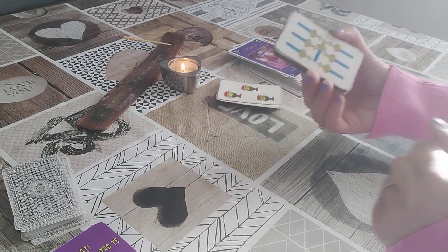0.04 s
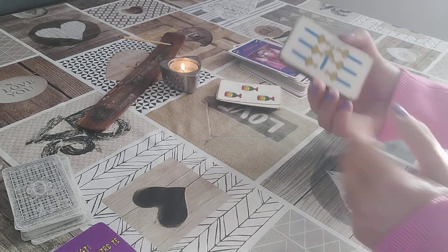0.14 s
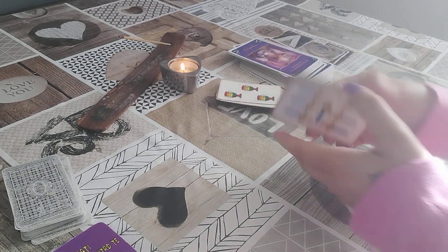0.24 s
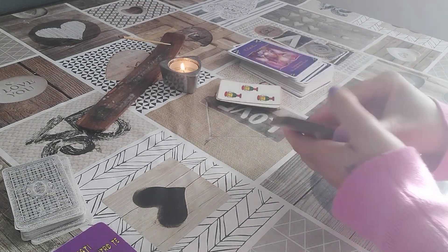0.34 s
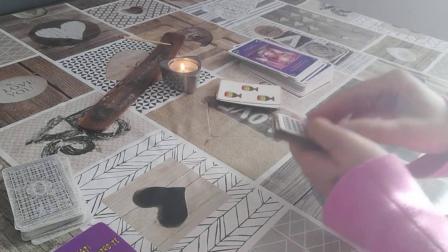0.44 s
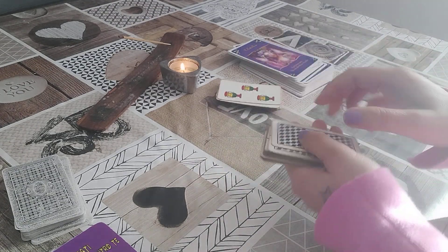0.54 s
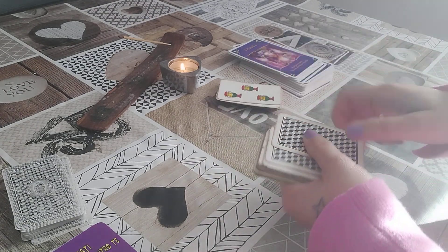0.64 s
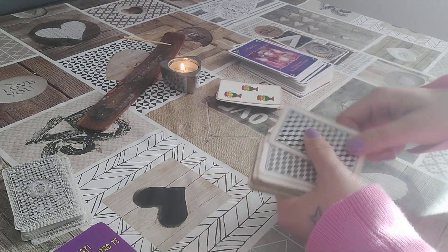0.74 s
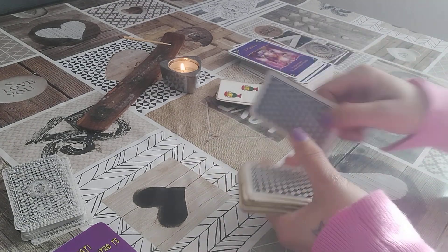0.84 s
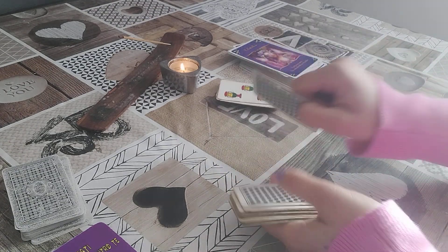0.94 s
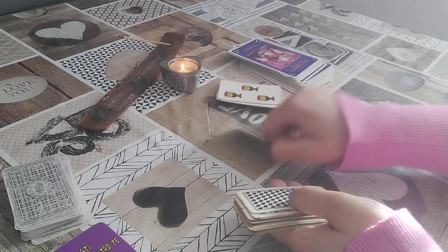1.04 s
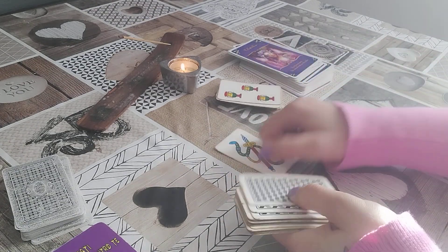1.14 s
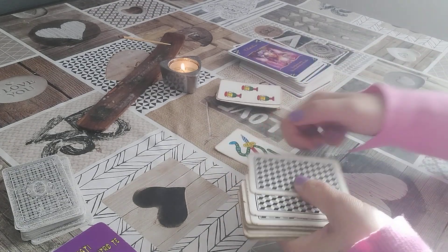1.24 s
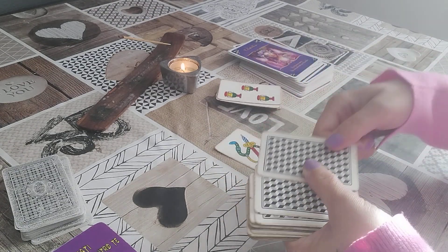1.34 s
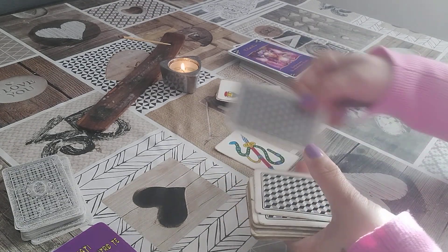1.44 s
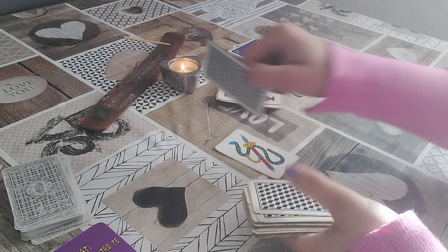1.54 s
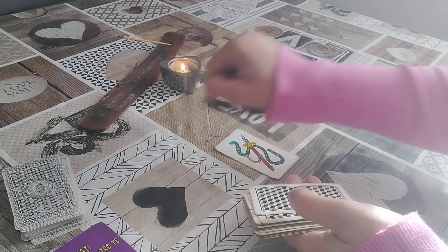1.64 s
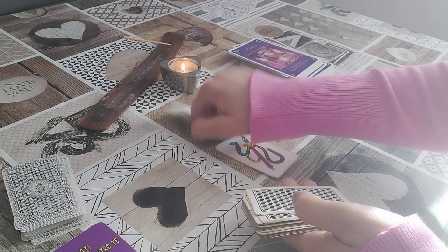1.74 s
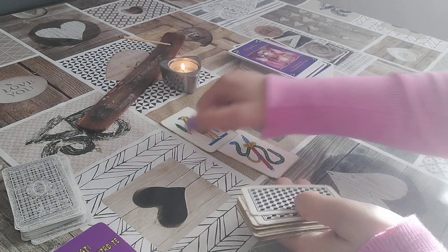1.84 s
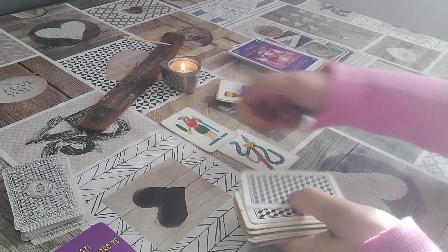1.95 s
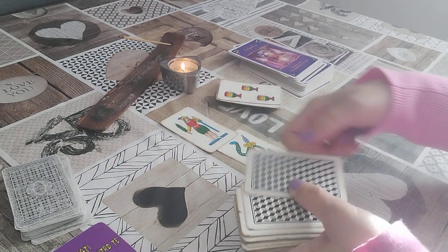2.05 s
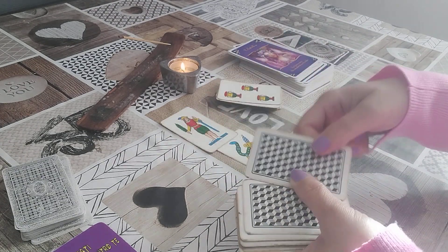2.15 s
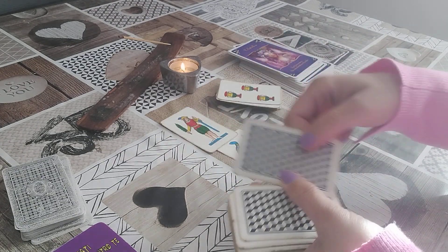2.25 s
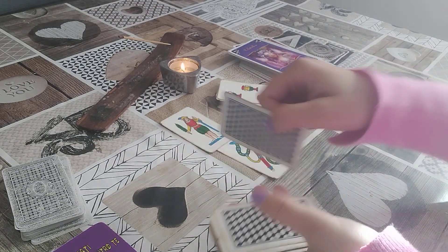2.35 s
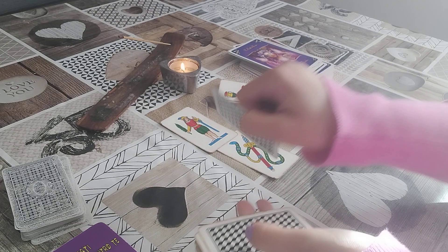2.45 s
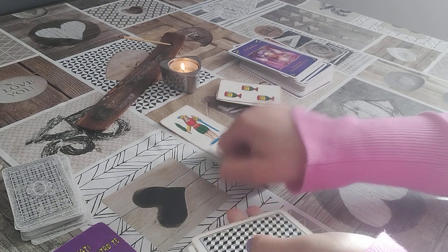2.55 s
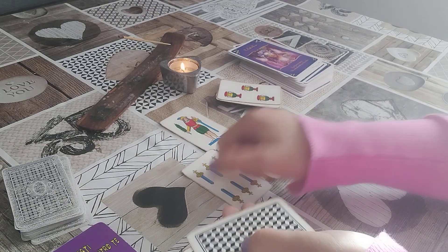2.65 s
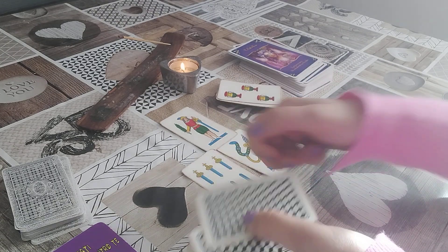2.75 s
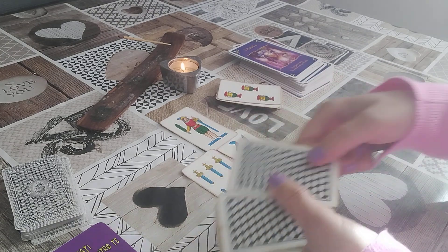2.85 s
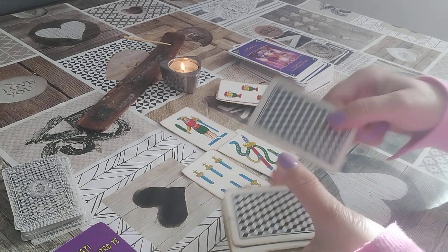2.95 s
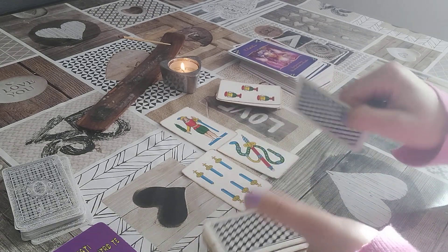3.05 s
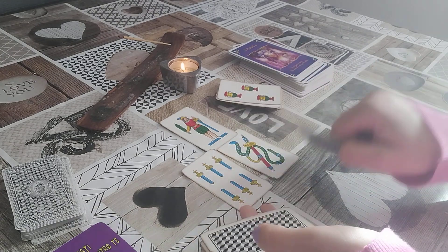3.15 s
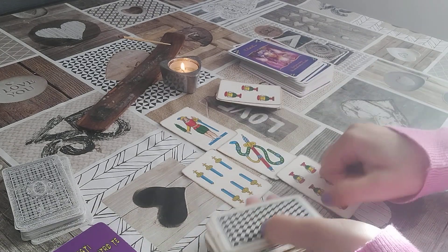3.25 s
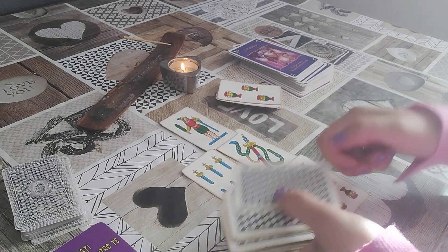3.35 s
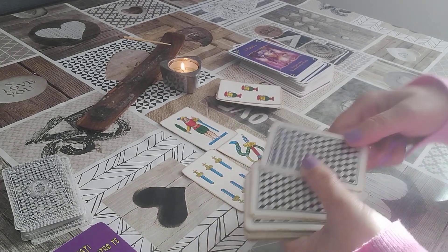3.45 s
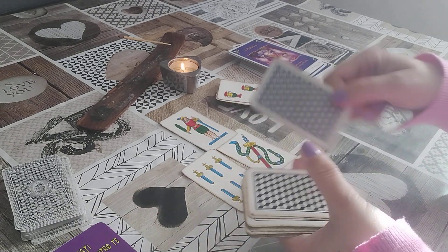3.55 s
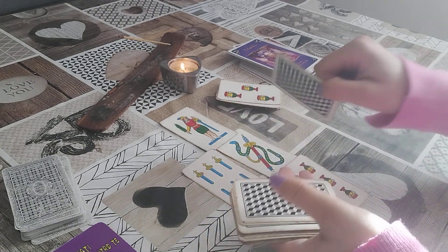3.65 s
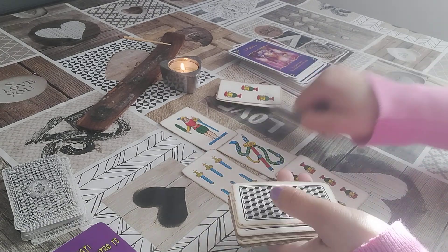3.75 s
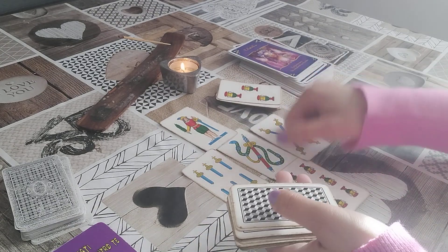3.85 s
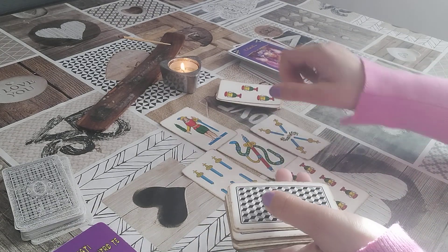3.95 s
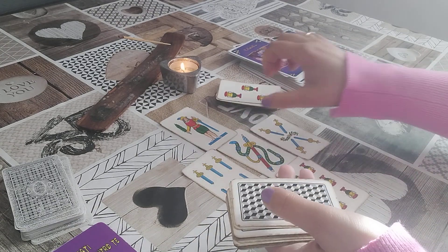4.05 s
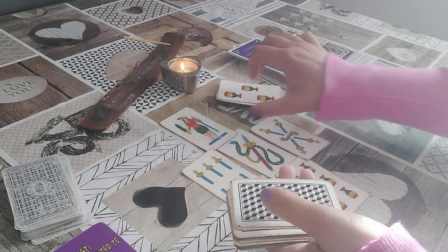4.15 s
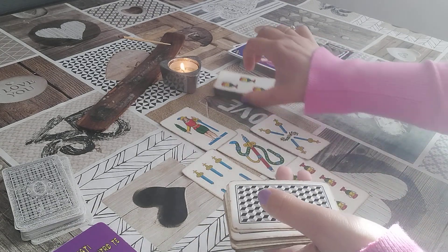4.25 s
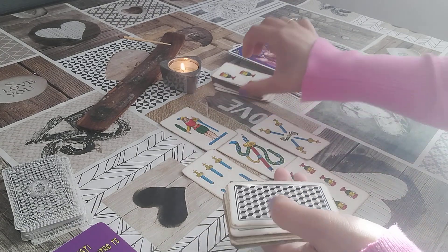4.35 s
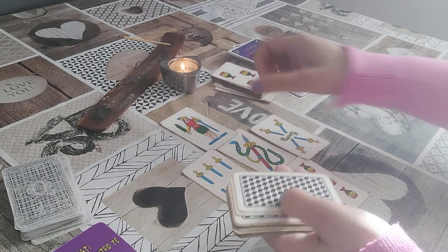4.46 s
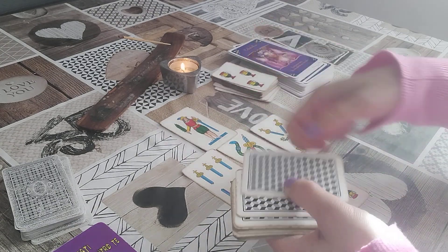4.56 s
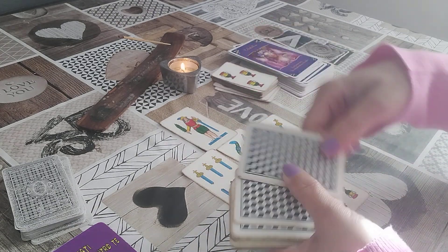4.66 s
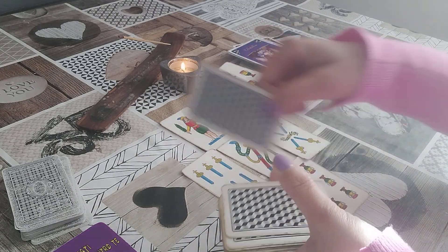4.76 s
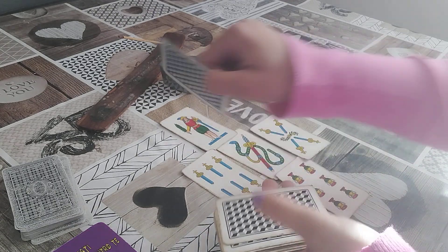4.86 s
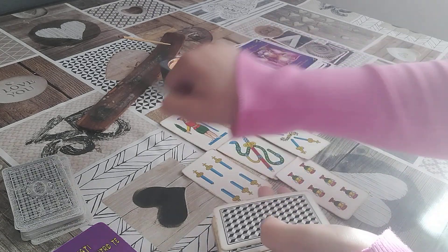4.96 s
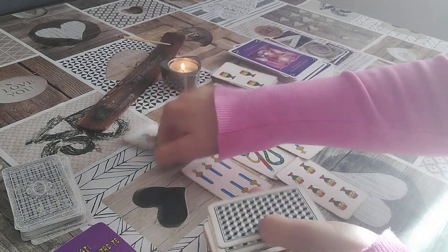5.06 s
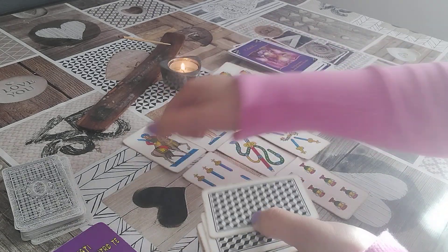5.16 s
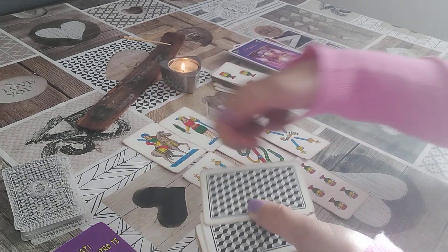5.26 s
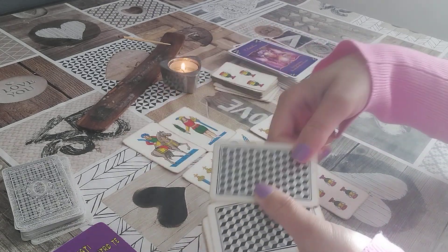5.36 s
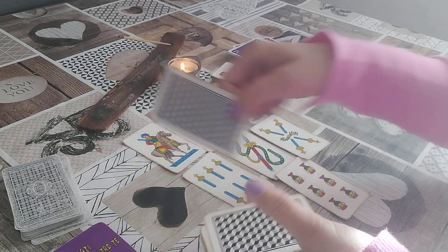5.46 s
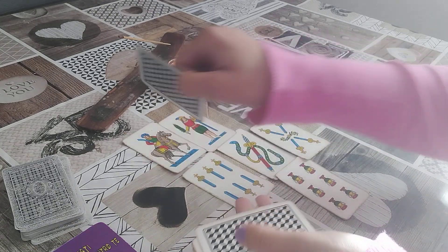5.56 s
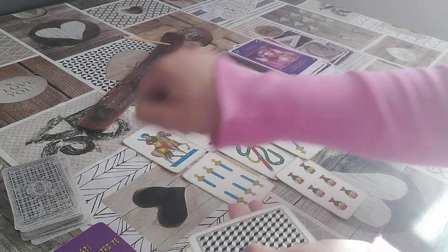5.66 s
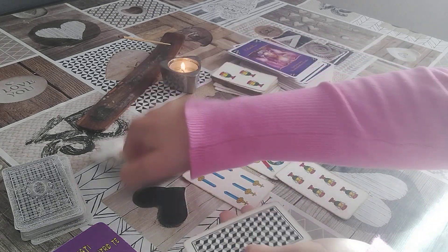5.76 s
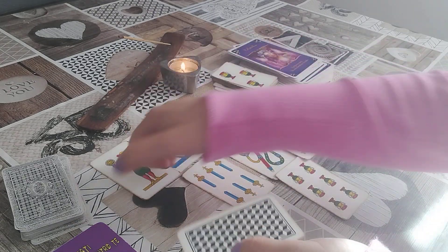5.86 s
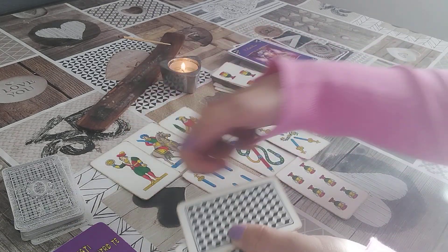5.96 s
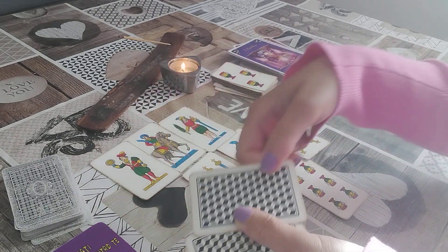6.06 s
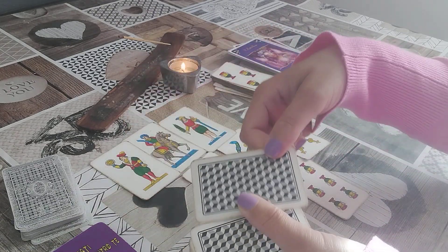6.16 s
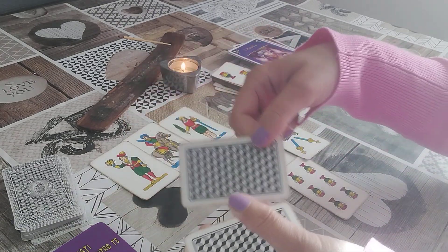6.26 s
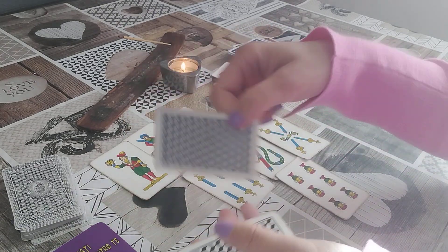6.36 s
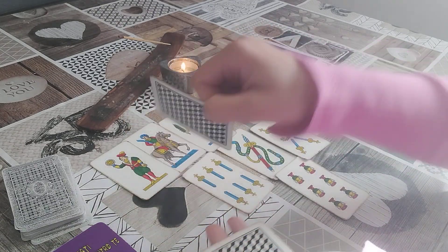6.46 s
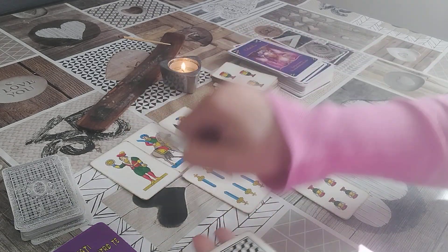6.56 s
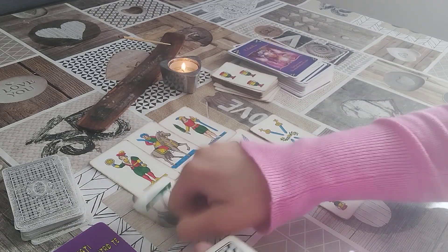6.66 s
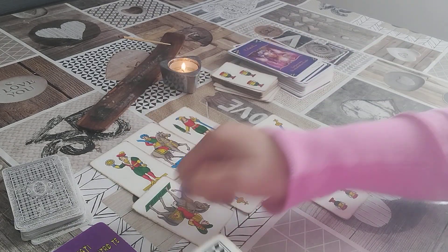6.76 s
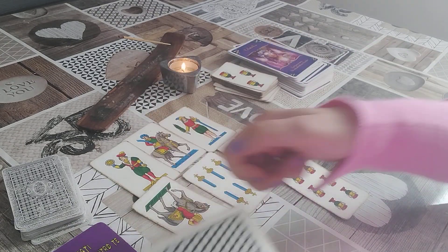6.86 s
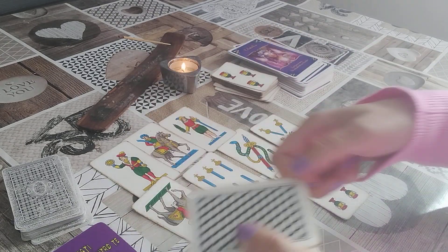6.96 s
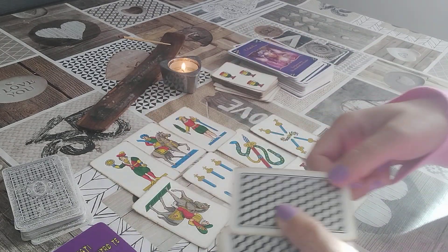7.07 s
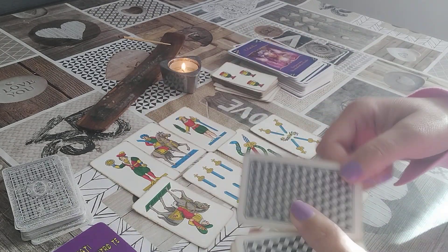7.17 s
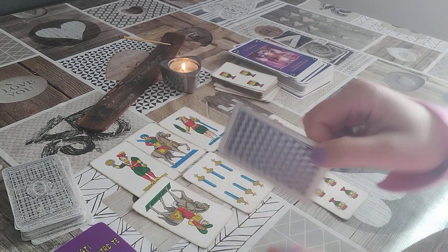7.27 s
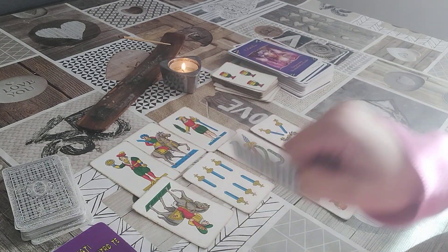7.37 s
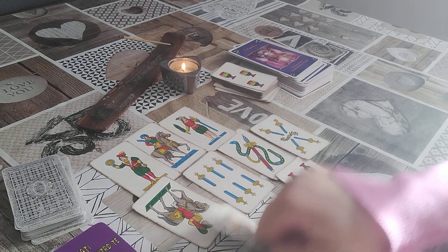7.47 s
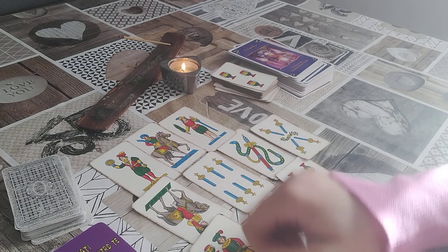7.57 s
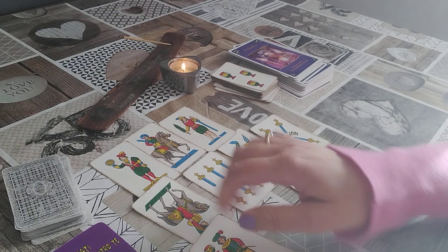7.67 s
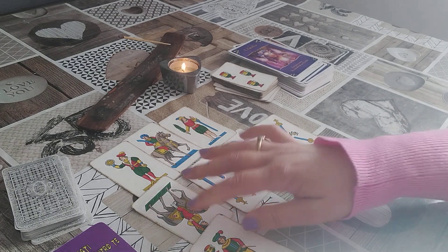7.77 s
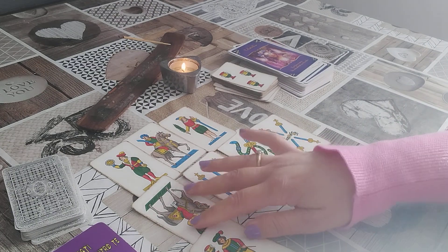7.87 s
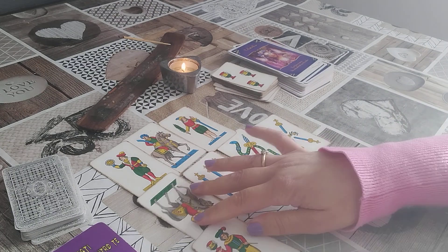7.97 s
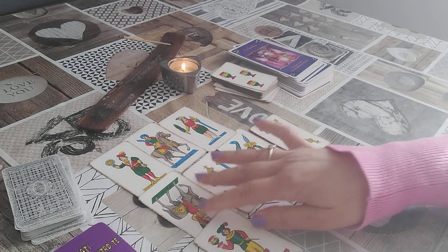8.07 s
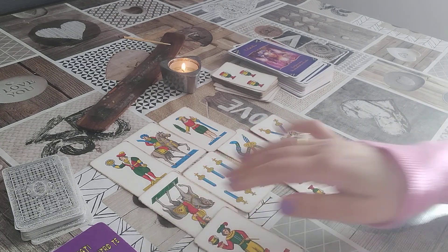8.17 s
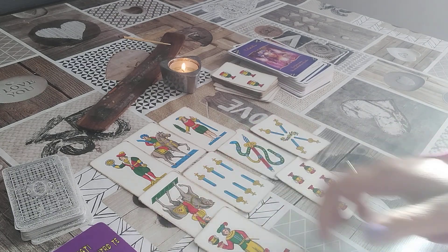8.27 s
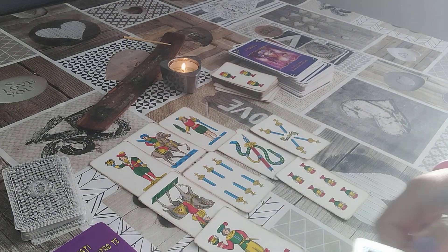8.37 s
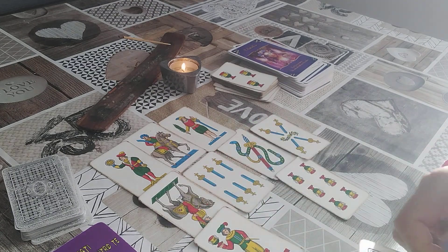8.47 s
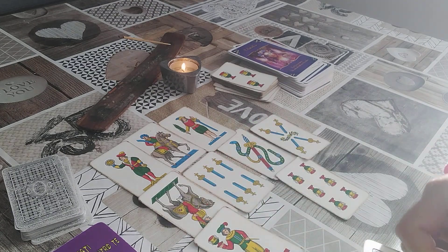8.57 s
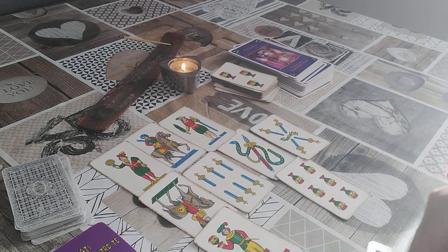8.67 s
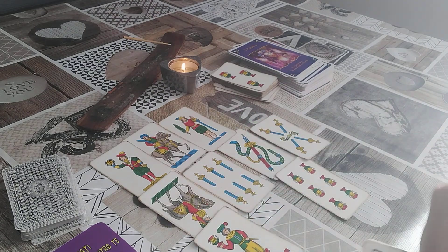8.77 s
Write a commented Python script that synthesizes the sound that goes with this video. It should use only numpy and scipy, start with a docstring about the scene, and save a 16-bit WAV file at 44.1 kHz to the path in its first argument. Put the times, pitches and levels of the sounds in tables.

```python
"""A small, quiet room: low rumble, drones and thin hiss from filtered noise, with two slow sine wobbles early
on. Card stock rubs in uneven grains of noise, then nine cards from a hand-held deck are turned up on a clothed
table. Each ticks down on its edge, settles, scrapes as it bends, zips off the fingertip, slaps, flaps and skids
on: contacts are short noise cracks over damped thuds, slides are grainy swells, and twice a sleeve swishes by
before a card lands. Table and room ring on in sines and echoes; between cards and after the last, clicks and
rubs of handling follow."""
import sys
import numpy as np
from scipy import signal
from scipy.fft import rfft, irfft, next_fast_len
from scipy.io import wavfile

SR = 44100
rng = np.random.default_rng(int(sys.argv[2]) if len(sys.argv) > 2 else 0)


def materialize(psi):
    """Save the field psi as 16-bit PCM at rate SR to the path in sys.argv[1].

    A 1-D psi becomes a single channel; in a 2-D psi each row is a channel.
    """
    bounded = np.clip(np.atleast_2d(psi).T, -1, 1)
    quanta = np.round(bounded * 32767).astype(np.int16)
    wavfile.write(sys.argv[1], SR, quanta)


N = 388521

# Levels in the tables are relative: the gains of the layers, the ports and the phone still act on them.
# A card leaves the fingertip and lands flat: (t/s, slap level/dB, slap brightness/dB, flex f/Hz, thud f/Hz,
# thud level/dB, left over right/dB, zip lead t/s, zip level/dB, zip brightness/dB, flap level/dB,
# flap brightness/dB)
CARD_SLAPS = [(1.213, -48.5, 1.5, 3250, 420, -50.5, 3, .0043, -63, -1, -59, 0),
              (1.8951, -41.5, -0.5, 5700, 510, -42.5, 1, .001, -65, -1, -46.5, 8),
              (2.7078, -44, 1, 5200, 363, -44, 3, .0046, -57, -6, -53, 4),
              (3.3476, -52, 4, 1600, 547, -43.5, -4, .0081, -46, -3.5, -46, 2),
              (3.911, -43, 2, 5800, 298, -44, -8.5, .003, -46, 4, -61, -2),
              (5.1715, -42, 1, 5900, 356, -41.5, 9.5, .0085, -57, -3, -51.5, -5),
              (5.9024, -37, -2, 1650, 365, -42, 5, .0034, -47.5, 6, -54.5, -5),
              (6.7855, -46, -2.5, 1130, 585, -38, 14, .0015, -52, 10, -57, 0),
              (7.6008, -52, -7, 1150, 290, -37.5, 7, .0077, -57, 2, -47.5, 8.5)]
# A card's edge meets the table, settles and scrapes: (t/s, tick level/dB, tick brightness/dB, thud f/Hz,
# settling delay t/s, settle level/dB, settle thud level/dB, scrape level/dB)
CARD_EDGES = [(1.1538, -50, 3.5, 440, 0.023, -61, -41.5, -60.5),
              (1.843, -55, 5.5, 320, .012, -56, -56, -61), (2.6479, -49, 4.5, 278, 0.011, -56, -51, -61),
              (3.2782, -55.5, 6.5, 775, .012, -64, -51, -61.5),
              (3.8652, -44, 5, 400, .0062, -48, -48.5, -70),
              (5.1183, -59, 6, 260, .0234, -55, -47.5, -55.5),
              (5.8479, -51, 6.5, 774, 0.018, -49, -54, -54),
              (6.729, -54.5, 3.5, 430, 0.011, -48.5, -45.5, -62),
              (7.5429, -56, -0.5, 260, 0.018, -56, -49.5, -62)]
# A sleeve swishes by just before a card lands: (middle t/s, half length t/s, level/dB)
AIR_SWISHES = [(3.788, 0.049, -71.5), (6.62, 0.076, -73.5)]
# Nails and card corners click in handling: (t/s, level/dB, brightness/dB, flex f/Hz)
HANDLING_CLICKS = [(1.4399, -60.5, -5, 1370), (1.4547, -53, -2, 1530), (2.2065, -54.5, -6, 1620),
                   (3.5768, -53.5, 0, 1250), (4.25, -61, 3, 4430), (4.6995, -58.5, -2.5, 2300),
                   (4.7066, -60.5, -9, 1500), (5.456, -58, 0, 2320), (5.62, -69.5, -13, 2110),
                   (5.7987, -70.5, -12.5, 2600), (6.2098, -70.5, -9, 1700), (7.088, -64, -7.5, 1640),
                   (7.2078, -67.5, -10, 1150), (7.2635, -63, -5, 1770), (8.4071, -68, -14, 1240),
                   (8.4475, -67.5, -8, 1140), (8.6804, -63, -12, 1300), (8.6943, -64, -11, 1190)]
# A card rubs over the deck or the cloth: (middle t/s, half length t/s, level/dB, brightness/dB)
CARD_RUBS = [(0.689, .049, -73.5, -0.5), (0.821, 0.016, -66.5, -7), (.9, 0.022, -64, -2.5),
             (1.383, 0.012, -68, -4), (2.13, 0.033, -69.5, -2.5), (2.201, 0.026, -65, -3.5),
             (2.362, .018, -61.5, -3.5), (2.427, 0.0085, -64.5, -3), (2.943, 0.025, -66.5, -4.5),
             (3.545, 0.032, -71, -3), (4.347, 0.027, -64, 2), (4.659, 0.043, -73, 1),
             (4.758, 0.014, -63.5, -2), (5.439, .023, -69.5, -5), (6.15, 0.014, -68.5, -3.5),
             (6.305, 0.016, -67.5, -7.5), (7.159, 0.01, -68, -4), (8.368, 0.065, -70.5, -1),
             (8.688, 0.0073, -63.5, -3)]

# Ranges of card sound, as knock, snap and sizzle: (lowest f/Hz, highest f/Hz)
PAPER_BANDS = [(900, 2800), (2800, 8000), (8000, 16500)]
# Tone of an edge tick: (flex f/Hz, knock level/dB, snap level/dB, sizzle level/dB)
TICK_VOICE = (4800, 2.5, 1, -2.5)
# Tone of the settling edge: (flex f/Hz, knock level/dB, snap level/dB, sizzle level/dB)
SETTLE_VOICE = (5400, -6, 0.5, -3)
# Tone of the bending scrape: (flex f/Hz, knock level/dB, snap level/dB, sizzle level/dB)
SCRAPE_VOICE = (1646, 1.5, 0, -1)
# Tone of the fingertip zip: (flex f/Hz, knock level/dB, snap level/dB, sizzle level/dB)
ZIP_VOICE = (3300, 2, 0, -1)
# Tone of a slap, whose flex pitch changes with the grip: (knock level/dB, snap level/dB, sizzle level/dB)
SLAP_VOICE = (-.5, 2.1, -1)
# Tone of the flapping free end: (flex f/Hz, knock level/dB, snap level/dB, sizzle level/dB)
FLAP_VOICE = (4500, -6.5, 1, -2)
# Tone of the skid: (flex f/Hz, knock level/dB, snap level/dB, sizzle level/dB)
SKID_VOICE = (3500, -12, 0, 1)
# Tone of a click, whose flex pitch changes with the grip: (knock level/dB, snap level/dB, sizzle level/dB)
CLICK_VOICE = (0, -0.62, 0)
# Tone of a rub: (flex f/Hz, knock level/dB, snap level/dB, sizzle level/dB)
RUB_VOICE = (1746, 0, -0.5, 0.5)
# Tone of a swish: (flex f/Hz, knock level/dB, snap level/dB, sizzle level/dB)
SWISH_VOICE = (5000, -16, -1, -4)

# Low resonances of table and room: (f/Hz, t60/s, level/dB)
TABLE_MODES = [(154.2, 1, -7), (203.6, 0.66, -5), (240.6, 0.37, 0), (274.4, 0.46, -0.5), (337.5, 0.19, 2),
               (389, 0.14, -16.5), (483, 0.55, -3.5), (576, 0.24, -4), (656, 0.086, -5)]
# The room's echo: (f/Hz, t60/s, level/dB)
ROOM_DECAY = [(198, 0.36, 3), (490, 1, -7.5), (990, 0.6, 0), (2000, 0.87, -4.5), (3880, 0.56, -0.5),
              (6500, 0.53, -3.5), (14000, 0.53, -2.5)]
# Colour of the two microphone ports: (f/Hz, left level/dB, right level/dB)
PORT_COLOUR = [(700, 5, 5), (1085, -1, -2.5), (2000, -5.5, -3.5), (2900, -2, -1.5), (3830, 0.5, 2.5),
               (6000, -4, -0.5), (7120, -7, -2.5), (8140, -15.5, -12), (9300, -9.5, -6), (10970, -8.5, -16),
               (13100, 1.5, -8), (16700, -11, -16)]
# The table sways under a moving arm: (middle t/s, half length t/s, f/Hz, peak level/dB)
TABLE_SWAYS = [(0.025, 0.1, 37.1, -43), (1.204, .09, 38, -44.5)]
# Spectrum of the quiet room: (f/Hz, relative density level/dB)
ROOM_RUMBLE = [(20, -62), (35, -80), (50, -75.5), (65, -81), (95, -80), (150, -80.5), (210, -81.5),
               (380, -89), (500, -90), (700, -95.5), (1100, -104), (2200, -110), (5000, -115), (7000, -121),
               (10000, -131)]
# Spectrum of faint microphone hiss: (f/Hz, relative density level/dB)
MIC_HISS = [(4000, -130), (7000, -125), (9500, -124), (11000, -128), (13000, -118), (15500, -119)]
# Pitches at which the rumble drones: (f/Hz, width f/Hz, rms level/dB)
RUMBLE_DRONES = [(119.3, 8.3, -69.5), (146.9, 7.8, -61.5), (193.8, 18.4, -62.5), (270.2, 19.2, -67.5),
                 (335.8, 9.1, -75.5), (467.1, 15, -70.5)]

# Table thud under a light touch: (f/Hz, level above the touch/dB); an edge tick brings its own pitch
FLAP_THUD, CLICK_THUD = (176, 1), (267, 3.3)
TICK_THUD_DB, SETTLE_THUD_HZ = 2, 432
EDGE_PAN_DB, SETTLE_PAN_DB, FLAP_PAN_DB, CLICK_PAN_DB = 3, 5, -1.5, 1  # left over right
SCRAPE_MIDDLE, SCRAPE_HALF = .6, .34  # shares of the time from edge to slap
ZIP_HALF_S, FLAP_AFTER_S = .0027, .0065
SKID_AFTER_S, SKID_HALF_S, SKID_DB = .02, .012, -24.5  # level relative to the slap
CONTACT_S = .006  # length over which a contact's level is reckoned
TOP_HZ = 16200


def card_slaps():
    """Each card's face slaps flat and thuds the table, then its free end flaps down."""
    rows = []
    for t_s, db, bright_db, flex_hz, thud_hz, thud_db, pan_db, *_, flap_db, flap_bright_db in CARD_SLAPS:
        tone = voice((flex_hz, *SLAP_VOICE), db, bright_db)
        rows.append((t_s, thud_hz, thud_db, *tone, pan_db))
        rows.append(touch(t_s + FLAP_AFTER_S, FLAP_VOICE, FLAP_THUD, flap_db, flap_bright_db, FLAP_PAN_DB))
    return contacts(rows, rise_s=0.0013, fall_s=0.0021, skirt_db=-14.5, flex_db=1,
                    thud_s=0.0023, thud_db=-2.5, gain_db=-1.5, shared=0.56)


def edge_ticks():
    """Each card's stiff edge ticks sharply on the table and settles a moment later."""
    rows = []
    for t_s, db, bright_db, thud_hz, settle_s, settle_db, settle_thud_db, _ in CARD_EDGES:
        rows.append(touch(t_s, TICK_VOICE, (thud_hz, TICK_THUD_DB), db, bright_db, EDGE_PAN_DB))
        settling = voice(SETTLE_VOICE, settle_db)
        rows.append((t_s + settle_s, SETTLE_THUD_HZ, settle_thud_db, *settling, SETTLE_PAN_DB))
    return contacts(rows, rise_s=0.00021, fall_s=0.00062, skirt_db=-19, flex_db=9,
                    thud_s=0.0024, thud_db=-3.5, gain_db=3.5, shared=0.68)


def card_scrapes():
    """Friction as each card bends against the table, zips off the fingertip and skids on after its slap."""
    rows = []
    for edge, slap in zip(CARD_EDGES, CARD_SLAPS):
        edge_s, *_, scrape_db = edge
        slap_s, slap_db, *_, lead_s, zip_db, zip_bright_db, _, _ = slap
        bend_s = slap_s - edge_s
        scrape_tone = voice(SCRAPE_VOICE, scrape_db)
        rows.append((edge_s + SCRAPE_MIDDLE * bend_s, SCRAPE_HALF * bend_s, *scrape_tone))
        rows.append((slap_s - lead_s, ZIP_HALF_S, *voice(ZIP_VOICE, zip_db, zip_bright_db)))
        rows.append((slap_s + SKID_AFTER_S, SKID_HALF_S, *voice(SKID_VOICE, slap_db + SKID_DB)))
    return slides(rows, grain_db=5.0, catch_db=4, flex_db=6, gain_db=0.0)


def air_swishes():
    """A sleeve brushes by before a card lands: smoother noise with little knock."""
    rows = [(t_s, half_s, *voice(SWISH_VOICE, db)) for t_s, half_s, db in AIR_SWISHES]
    return slides(rows, grain_db=2, catch_db=1, flex_db=12, gain_db=1.5)


def handling_clicks():
    """Nails and card corners make short, light cracks."""
    rows = []
    for t_s, db, bright_db, flex_hz in HANDLING_CLICKS:
        rows.append(touch(t_s, (flex_hz, *CLICK_VOICE), CLICK_THUD, db, bright_db, CLICK_PAN_DB))
    return contacts(rows, rise_s=0.00087, fall_s=0.00083, skirt_db=-24, flex_db=4,
                    thud_s=0.0025, thud_db=-4, gain_db=0.5, shared=0.88)


def card_rubs():
    """Soft friction of a card over the deck or the cloth."""
    rows = [(t_s, half_s, *voice(RUB_VOICE, db, bright_db)) for t_s, half_s, db, bright_db in CARD_RUBS]
    return slides(rows, grain_db=2.5, catch_db=3.0, flex_db=4, gain_db=2)


def voice(tone, db, bright_db=0):
    """Flex pitch and the levels of knock, snap and sizzle; brightness tips them about the snap."""
    flex_hz, knock_db, snap_db, sizzle_db = tone
    return flex_hz, db + knock_db - bright_db, db + snap_db, db + sizzle_db + bright_db


def touch(t_s, tone, thud, db, bright_db, pan_db):
    """A light contact whose thud follows its strength."""
    thud_hz, above_db = thud
    return (t_s, thud_hz, db + above_db, *voice(tone, db, bright_db), pan_db)


def contacts(table, rise_s, fall_s, skirt_db, flex_db, thud_s, thud_db, gain_db, shared):
    """Each contact is a crack that swells and dies within milliseconds, over a damped thud of the table."""
    lead_s = .012  # room for the swell ahead of the hit
    t = np.arange(2048) / SR - lead_s
    after = np.maximum(t + .001, 0)  # the thud starts 1 ms ahead of the hit
    # a sharp core where the card hits, inside a softer skirt where the rest of it settles
    spread = np.abs(t) / np.where(t < 0, rise_s, fall_s)
    crack_shape = np.exp(-spread) + amp(skirt_db) * np.exp(-spread / 4)
    shudder_shape = (after > 0) * np.exp(-after / 0.0034)
    out = np.zeros((2, N))
    for t_s, thud_hz, low_db, flex_hz, *levels_db, pan_db in table:
        crack = paper(burst(crack_shape, shared), flex_hz, flex_db, levels_db, CONTACT_S)
        push = unit(np.sin(2 * np.pi * thud_hz * after) * np.exp(-after / thud_s))
        shudder = unit(band(burst(shudder_shape, 0.26), 150, 793))
        thud = unit(push + 0.65 * shudder) * amp(low_db + thud_db) * np.sqrt(CONTACT_S * SR)
        pan = amp([[pan_db / 2], [-pan_db / 2]])
        add(out, t_s - lead_s, thud + amp(gain_db) * crack * pan)
    return out


def slides(table, grain_db, catch_db, flex_db, gain_db):
    """Sliding card catches and slips every few milliseconds, in tiny uneven grains, under a smooth swell."""
    out = np.zeros((2, N))
    for t_s, half_s, flex_hz, *levels_db in table:
        t = np.arange(-2.5 * half_s, 2.5 * half_s, 1 / SR)
        grains = grain_db * steps(len(t), count=24)
        catches = catch_db * steps(len(t), count=150)
        swell = np.exp(-(t / half_s) ** 2 / 2.0)
        friction = pair(len(t), 0.85) * amp(grains + catches) * swell
        add(out, t_s + t[0], amp(gain_db) * paper(friction, flex_hz, flex_db, levels_db, 2 * half_s))
    return out


def paper(excitation, flex_hz, flex_db, levels_db, seconds):
    """Card stock has one broad flex resonance, set by the grip, and sounds as knock, snap and sizzle."""
    resonance = band(excitation, flex_hz / 1.1, flex_hz * 1.16, order=1)
    flexing = excitation + amp(flex_db) * resonance
    ranges = [amp(db) * unit(band(flexing, *edges)) for db, edges in zip(levels_db, PAPER_BANDS)]
    return sum(ranges) * np.sqrt(seconds * SR)


def burst(shape, shared):
    """A short noise with its spectral peaks partly flattened, so that it sounds like an even crack."""
    spectrum = rfft(pair(len(shape), shared) * shape)
    flattened = irfft(spectrum / np.abs(spectrum) ** .55, len(shape))
    return flattened * shape ** .2


def steps(size, count):
    """Random levels, each held for count samples."""
    return np.repeat(rng.standard_normal(size // count + 1), count)[:size]


def pair(size, shared):
    """Noise for two microphones that have a share of its power in common."""
    shared = np.clip(shared, 0, 1)
    noise = rng.standard_normal((3, size))
    return np.sqrt(shared) * noise[0] + np.sqrt(1 - shared) * noise[1:]


def amp(db):
    """Turn decibels into an amplitude factor."""
    return 10 ** (np.asarray(db) / 20)


def unit(x):
    """Scale to an energy of 1 in each channel."""
    return x / np.sqrt(np.sum(x ** 2, axis=-1, keepdims=True))


def band(x, lo_hz, hi_hz, order=3):
    """Causal band-pass."""
    return signal.sosfilt(signal.butter(order, [lo_hz, hi_hz], "band", fs=SR, output="sos"), x)


def colour(x, hz, db):
    """Shape a whole track by a spectrum drawn through points of frequency and level."""
    size = 2 * next_fast_len(N // 2 + 2048)
    f = np.maximum(np.fft.rfftfreq(size, 1 / SR), 1)
    gain = amp(np.interp(np.log(f), np.log(hz), db))
    return irfft(rfft(x, size) * gain, size)[..., :N]


def add(track, start_s, sound):
    """Mix in stereo; the right channel lags by a random 0 to 8 samples, which varies the width."""
    for channel, lag in enumerate((0, rng.integers(0, 9))):
        i = max(int(start_s * SR), 0) + lag
        part = sound[channel, :max(N - i, 0)]
        track[channel, i:i + len(part)] += part


def low_ring(x, ring_db):
    """Table and room keep ringing at a few low pitches after each sound that drives them."""
    t = np.arange(int(.7 * SR)) / SR
    response = 0
    for hz, t60, db in TABLE_MODES:
        # the higher the pitch, the more the two ports differ in phase
        phase = rng.uniform(0, 2 * np.pi) + hz / 900 * rng.standard_normal((2, 1))
        envelope = np.exp(-np.log(1000) * t / t60) * (1 - np.exp(-t / 0.0039))
        response = response + amp(db) * unit(np.sin(2 * np.pi * hz * t + phase) * envelope)
    return amp(ring_db) * signal.fftconvolve(x, response, axes=1)[:, :N]


def room(x, wet_db, count):
    """The hand moves from place to place, so each of count equal stretches meets its own pattern of echoes."""
    out = np.zeros((2, N))
    for stretch in np.array_split(np.arange(N), count):
        response = echoes(build_s=0.003, early_db=-2, early_s=0.022)
        reflected = signal.fftconvolve(x[None, :, stretch], response, axes=2).sum(axis=1)
        add(out, stretch[0] / SR, reflected)
    return amp(wet_db) * out


def echoes(build_s, early_db, early_s):
    """Echoes from either side to both ports: close scatter, then a diffuse tail whose decay varies with pitch."""
    t = np.arange(16384) / SR
    hz, t60, db = np.transpose(ROOM_DECAY)
    f = np.log(np.maximum(np.fft.rfftfreq(len(t), 1 / SR), 1))
    noise = rfft(rng.standard_normal((2, 2, len(t))))
    response = 0
    # overlapping bands, each with its own decay
    for k, weight in enumerate(np.eye(len(hz))):
        part = irfft(noise * np.interp(f, np.log(hz), weight), len(t))
        response = response + amp(db[k]) * part * np.exp(-np.log(1000) * t / t60[k])
    build = 1 - np.exp(-(t / build_s) ** 2)
    scatter = 1 + amp(early_db) * np.exp(-t / early_s)
    return response * build * scatter


def sway():
    """A very low sine wobble of the table that swells and fades."""
    t = np.arange(N) / SR
    out = 0
    for t_s, half_s, hz, db in TABLE_SWAYS:
        out = out + amp(db) * np.sin(2 * np.pi * hz * t) * np.exp(-((t - t_s) / half_s) ** 2)
    return out


def background():
    """Low rumble that drones at the room's pitches, where it is most alike at both ports, under a thin hiss."""
    per_hz = np.sqrt(SR / 2)
    common = colour(rng.standard_normal(N), [50, 150, 400, 1000], [-5.5, -0.1, -2, -15.0])
    apart = colour(pair(N, 0), [50, 150, 400, 1000], [1.5, -15.5, -0.5, 0.65])
    rumble = colour(common + apart, *np.transpose(ROOM_RUMBLE))
    hiss = colour(pair(N, 0), *np.transpose(MIC_HISS))
    out = per_hz * (rumble + hiss)
    for hz, width_hz, db in RUMBLE_DRONES:
        drone = unit(band(pair(N, 0.86), hz - width_hz / 2, hz + width_hz / 2, order=2))
        out = out + amp(db) * np.sqrt(N) * drone
    return out


def scene():
    """Dealing and handling, heard directly and through table and room, by two microphone ports."""
    slaps, ticks, scrapes = card_slaps(), edge_ticks(), card_scrapes()
    clicks, rubs = handling_clicks(), card_rubs()
    direct = ticks + slaps + clicks + scrapes + rubs + air_swishes()
    # a card's flat face throws more sound into the room than its edge does
    thrown = slaps + amp(-4) * (ticks + clicks) + amp(-2) * scrapes + amp(-3) * rubs
    cards = direct + room(thrown, wet_db=-36.5, count=9) + low_ring(thrown, ring_db=-22.5)
    hz, left_db, right_db = np.transpose(PORT_COLOUR)
    ports = np.array([colour(cards[0], hz, left_db), colour(cards[1], hz, right_db)])
    return ports + sway() + background()


def record(dry):
    """The phone drops the deepest bass and cuts the top."""
    dry = signal.sosfilt(signal.butter(2, 18, "high", fs=SR, output="sos"), dry)
    return signal.sosfilt(signal.ellip(8, .2, 70, TOP_HZ, fs=SR, output="sos"), dry)


dry = scene()
out = record(dry)
materialize(out)
```